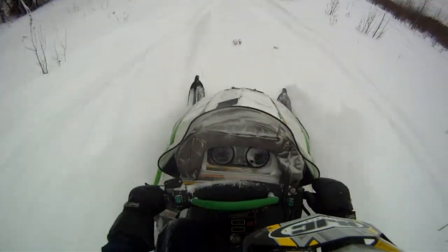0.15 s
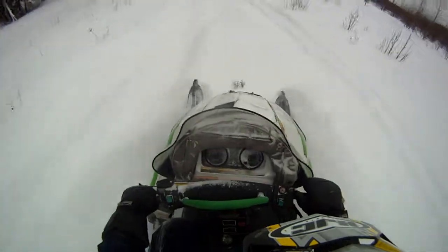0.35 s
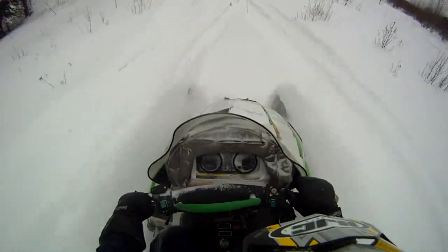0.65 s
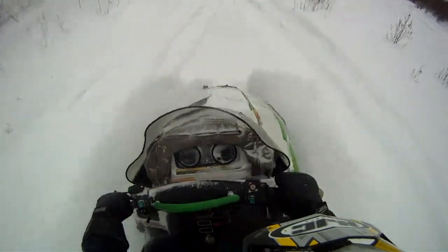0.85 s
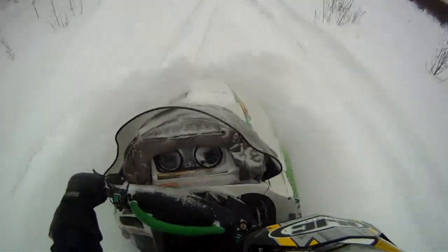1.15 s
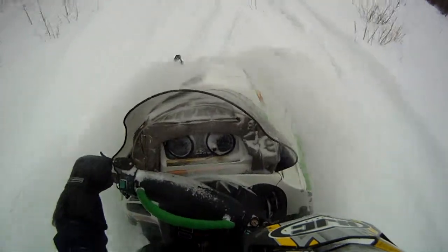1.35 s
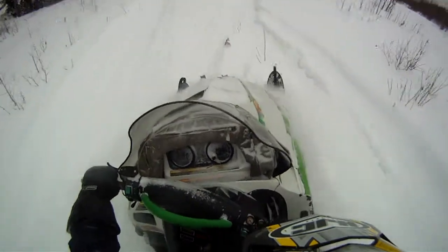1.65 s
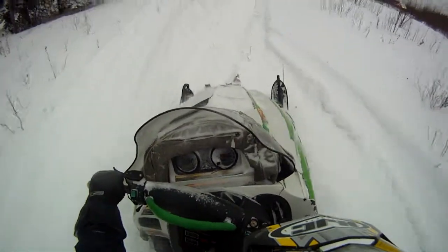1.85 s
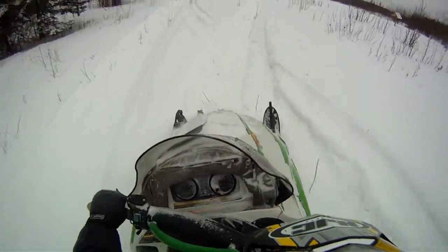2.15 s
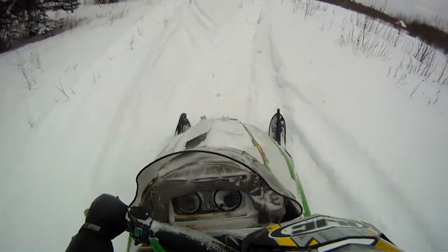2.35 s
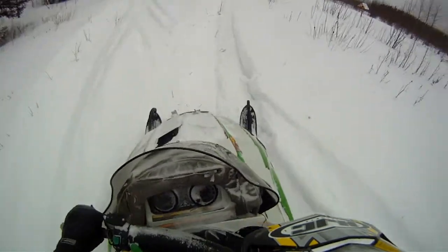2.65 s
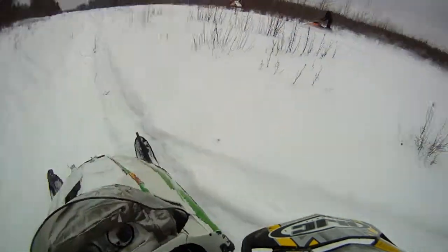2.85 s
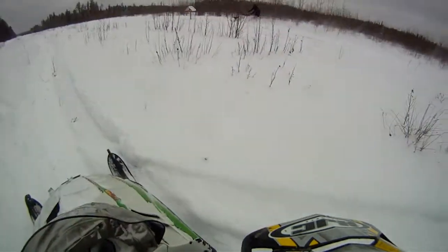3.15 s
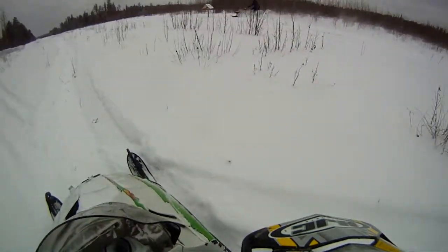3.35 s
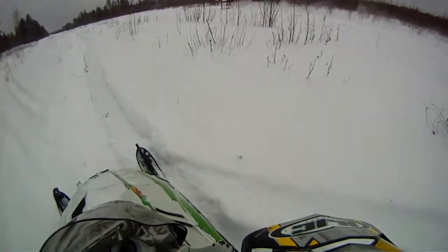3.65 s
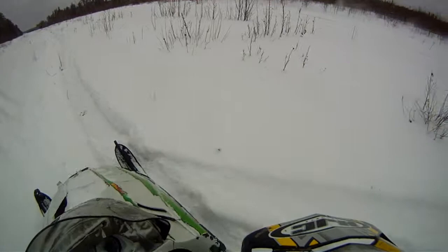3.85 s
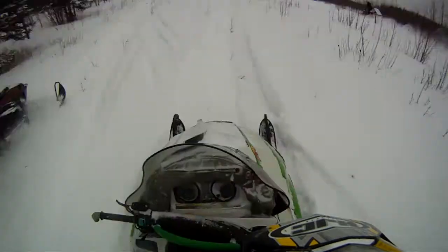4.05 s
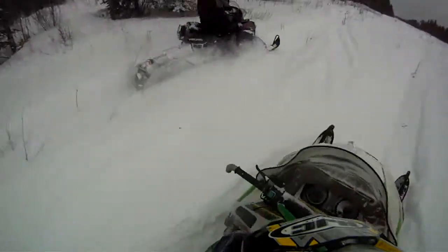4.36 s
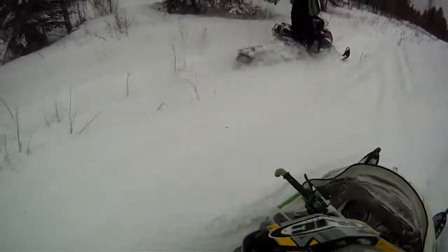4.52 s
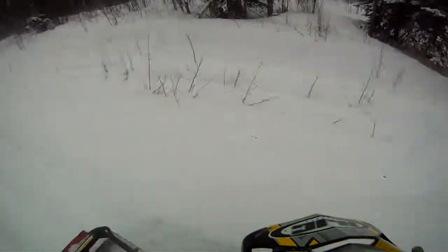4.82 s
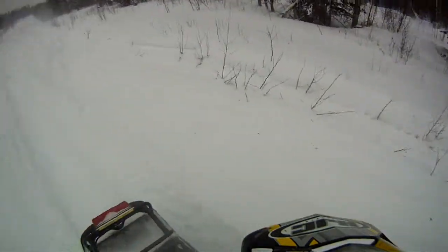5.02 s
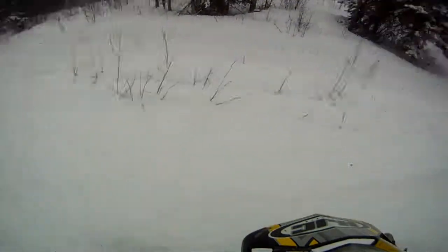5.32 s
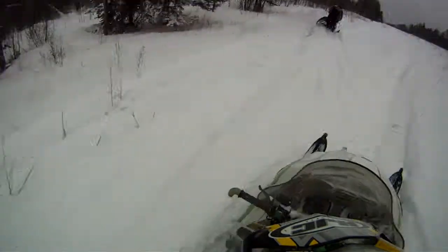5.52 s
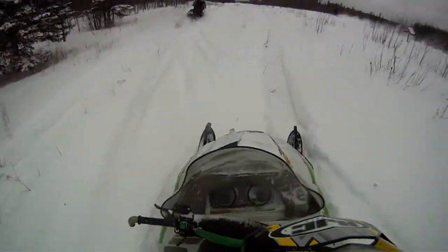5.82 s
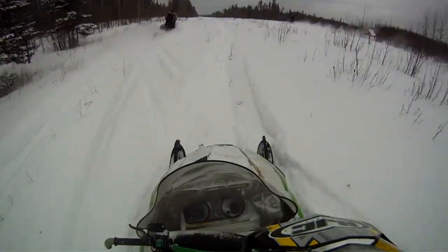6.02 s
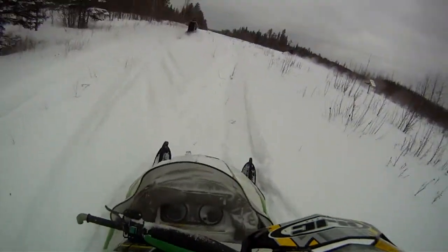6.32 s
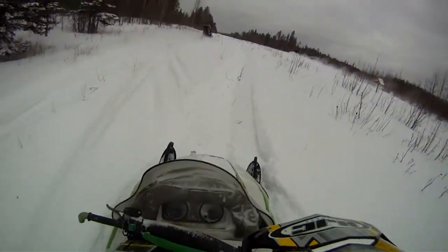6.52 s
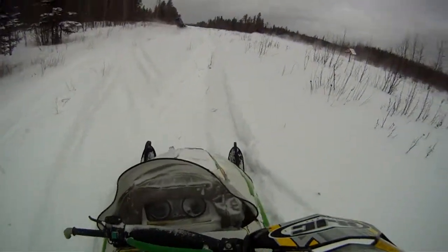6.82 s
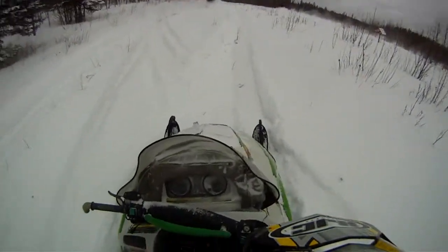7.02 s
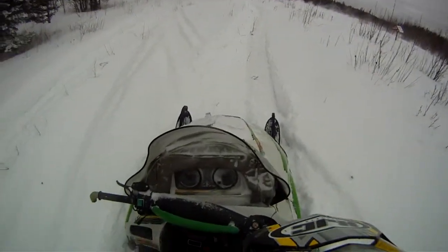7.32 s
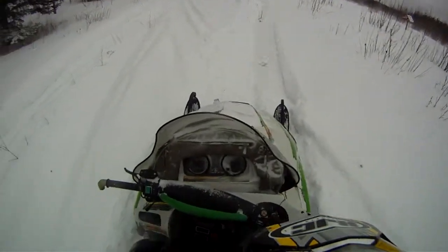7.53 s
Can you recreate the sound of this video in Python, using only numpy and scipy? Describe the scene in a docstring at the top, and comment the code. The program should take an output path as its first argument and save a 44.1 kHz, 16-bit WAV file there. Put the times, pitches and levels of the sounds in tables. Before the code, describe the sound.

A two-stroke snowmobile idles close by with a steady drone, a fizzy metallic rattle and a low rumble. Early on, one throttle blip makes it rise in a snarl and fall back. A second snowmobile revs past with a wavering whine and fades away. Near the end, a loud knock and dull bumps hit the helmet-mounted microphone while the idle continues. The open snow gives no echo.

```python
"""A two-stroke snowmobile idles in snow, heard from a camera on the rider's helmet: the exhaust drones,
the pistons rattle the hood, and the camera's coarse sampling mirrors the clatter into a thin fizz.
One blip of the throttle makes the pipe boom and the airbox snarl while a second sled pulls up.
That sled revs past, whining, and drives off as the rider looks over a shoulder.
Last, the helmet is knocked, wobbles on its padding and creaks."""
import sys
import numpy as np
from scipy import signal
from scipy.fft import rfft, irfft
from scipy.io import wavfile

SR = 44100
rng = np.random.default_rng(int(sys.argv[2]) if len(sys.argv) > 2 else 0)


def wav_out(sig):
    """Save sig, one row per channel (or a flat mono array), as 16-bit PCM at SR to the path in sys.argv[1]."""
    wavfile.write(sys.argv[1], SR, np.round(np.clip(np.atleast_2d(sig).T, -1, 1) * 32767).astype(np.int16))


N = 338688
T = np.arange(N) / SR
HZ = np.fft.rfftfreq(N, 1 / SR)

# firing rate of the rider's engine: time_s, firing_hz
ENGINE_SPEED = [(0.0, 133.1), (0.06, 128.7), (0.25, 124.9), (1.24, 120.8), (1.3, 124.7), (1.5, 156.0),
                (1.73, 171.9), (2.01, 134.3), (2.14, 127.7), (2.48, 123.7), (3.51, 126.2), (3.78, 124.0),
                (3.91, 126.3), (5.67, 126.1), (6.91, 122.8), (7.68, 125.6)]
# hood and crankcase resonances of both sleds: centre_hz, width_hz, gain_db
HOOD_MODES = [(580, 220, -13.5), (780, 48, -10.5), (988.4, 97, -2.5), (1140, 62, -10), (1248, 91, -4.5),
              (1454, 29, 4), (1619, 310, 4), (1912, 180, 1.5), (2230, 175, 0.5), (2190, 580, -8),
              (3002, 145, -6), (4300, 150, -14)]


def amp(db):
    """Decibels to gain."""
    return 10 ** (np.asarray(db) / 20)


def unit(x):
    """Scales to rms 1."""
    return x / np.sqrt(np.mean(x ** 2) + 1e-20)


def curves(rows):
    """Each column of a table, joined by straight lines over time."""
    times, *columns = np.transpose(rows)
    return [np.interp(T, times, column) for column in columns]


def bell(x, middle, width):
    """A smooth hump of height 1."""
    return np.exp(-((x - middle) / width) ** 2)


def arch(start_s, length_s):
    """A rounded swell from 0 to 1 and back."""
    return np.sqrt(np.maximum(1 - (2 * (T - start_s) / length_s - 1) ** 2, 0))


def slope(points):
    """An EQ curve drawn through (Hz, dB) points."""
    hz, db = np.transpose(points)
    return amp(np.interp(np.log(HZ + 1), np.log(hz), db))


def bumps(modes):
    """The EQ curve of a set of resonances."""
    powers = (amp(2 * db) / (1 + ((HZ - hz) / (0.5 * width)) ** 2) ** 2 for hz, width, db in modes)
    return np.sqrt(sum(powers))


def colour(x, gain):
    """Minimum-phase filter with the given EQ curve; rms 1 out."""
    cepstrum = irfft(np.log(np.maximum(gain, 1e-5)), N)
    cepstrum[1:N // 2] *= 2
    cepstrum[N // 2 + 1:] = 0
    return unit(irfft(rfft(x) * np.exp(rfft(cepstrum)), N))


def noise():
    """White noise of rms 1."""
    return rng.standard_normal(N)


def drift(hz):
    """A smooth random wander of rms 1, no faster than about hz."""
    step = 32
    white = rng.standard_normal(N // step + 1)
    lowpass = bell(np.fft.rfftfreq(len(white), step / SR), 0, hz)
    slow = irfft(rfft(white) * lowpass, len(white))
    return np.interp(np.arange(N) / step, np.arange(len(slow)), unit(slow))


def partial(turns, order):
    """A cosine at a multiple of the firing rate, with a random phase."""
    return np.cos(2 * np.pi * (order * turns + rng.random()))


def blows(turns, spread_db, jitter_s):
    """One click a turn, each of its own strength and a little off its time."""
    at = np.flatnonzero(np.diff(np.floor(turns)) > 0)
    size, shift = rng.standard_normal((len(at), 2)).T
    at = np.clip(at + np.round(shift * jitter_s * SR).astype(int), 0, N - 1)
    clicks = np.zeros(N)
    clicks[at] = amp(spread_db * np.clip(size, -2, 2))
    return unit(clicks)


def exhaust(turns, load):
    """Firing orders flutter as the burns vary; unequal cylinders add half orders that grow under load."""
    # the exhaust note and what shifts it: order, idle_db, throttle_db, lean_db, head_db
    orders = [(1, -42.5, 10, -5, 2.5), (2, -54, 3.5, 0, -1.5), (3, -70, 4, 20, 11), (4, -57, -1, -6, -1),
              (5, -53, -7, -11.5, 2)]
    # the rider leans out to one side and sits up again: time_s, lean (0-1)
    posture = [(0, 0.47), (.55, 0.4), (.95, 0.99), (1.9, 0.76), (2.3, 0.82), (2.7, 0.26), (3.6, 0.62),
               (4.4, .1), (6.7, 0.2)]
    pipe_hz, pipe_width_hz, pipe_db = 304.5, 22, 13
    firing_hz, = curves(ENGINE_SPEED)
    lean, = curves(posture)
    opening, head, burn = throttle(), head_turn(), drift(42)
    note = np.zeros(N)
    for order, idle_db, throttle_db, lean_db, head_db in orders:
        # on open throttle, the pipe booms as an order sweeps through its resonance
        boom_db = pipe_db * bell(order * firing_hz, pipe_hz, pipe_width_hz)
        db = idle_db + (throttle_db + boom_db) * opening + lean_db * lean + head_db * head
        flutter = 1 + 0.12 * burn + 0.13 * drift(41)
        note += amp(db) * flutter * partial(turns, order)
    halves = sum((1 + 0.6 * drift(14)) * partial(turns, k + .5) / np.sqrt(k + 1) for k in range(5))
    return np.sqrt(2) * (note + amp(-64.5 + 13.5 * load - 12 * head) * halves)


def machinery(turns, load):
    """Piston slap, loose clutch parts and fan puffs ring the hood; the colour shifts as the head turns."""
    # the hood's panels, between its resonances: freq_hz, gain_db
    panel_eq = [(120, -31), (200, -9.5), (420, -14), (850, -51), (1300, -49), (2000, -1), (2750, -8),
                (3500, -27), (4800, -45), (5600, -26)]
    # the bright rattle, facing forward: freq_hz, gain_db
    ahead_eq = [(1800, -15.5), (2600, -17), (3250, 3.5), (3500, 6.5), (3850, -1), (4250, 4.5), (5000, -3.5),
                (5700, -4.5)]
    # the rattle with the head fully turned: freq_hz, gain_db
    turned_eq = [(1800, -21), (2700, 10), (3300, 6), (4200, 1), (4700, 8), (5050, 5), (5350, -21),
                 (5700, -9)]
    # the rattle's fader, before load lifts it: time_s, level_db
    rattle_fader = [(0, -43.5), (.9, -50), (2.8, -47), (3.2, -43), (3.7, -43), (4.45, -51.5), (5.1, -46.5),
                    (5.7, -52), (7.68, -54)]
    rattle_db, = curves(rattle_fader)
    head = head_turn()
    first_piston = blows(turns / 2, spread_db=2.5, jitter_s=.00003)
    second_piston = blows(turns / 2 + .46, spread_db=4.5, jitter_s=.00005)
    slap = unit(first_piston + 1.08 * second_piston)
    loose = unit((rng.random(N) < 600 / SR) * noise())  # about 600 clicks a second
    fan = 1 + 0.015 * np.cos(2 * np.pi * turns) + 0.034 * np.cos(np.pi * turns) + 0.26 * drift(93)
    puffs = unit(fan * noise())
    # many short paths under the hood smear each blow over a few milliseconds
    paths = rng.standard_normal(2048) * np.exp(-T[:2048] / .004)
    knocking = unit(signal.oaconvolve(slap, paths)[:N])
    strokes = .3 * slap + .4 * knocking + .4 * loose + .7 * puffs
    hood = colour(strokes, np.hypot(slope(panel_eq), bumps(HOOD_MODES)))
    # two bands of noise come through with the head half turned
    glance_eq = bumps([(979, 45, -1.7), (2458, 160, 0.72)])
    glance = amp(-6) * np.sin(np.pi * head) * colour(noise(), glance_eq)
    chatter = 0.33 * slap + 0.13 * loose + 0.8 * puffs + 0.98 * noise()
    rattle = (1 - head) * colour(chatter, slope(ahead_eq)) + head * colour(chatter, slope(turned_eq))
    return amp(-40.5 + 6.5 * load) * (hood + glance) + amp(rattle_db + 9 * load) * rattle


def frame_rumble():
    """The frame's vibration comes up through the rider as a low rumble."""
    # the rumble's tone: freq_hz, gain_db
    rumble_eq = [(10, -7), (20, -13), (35, -5), (49, 2), (65, -6.5), (88, 0.5), (112, -4), (140, -8),
                 (175, -15), (260, -24.5), (380, -24), (500, -32), (1500, -53)]
    # its fader: time_s, level_db
    rumble_fader = [(0, -41.5), (1.0, -48.5), (1.7, -45.5), (2.3, -47), (3.8, -42.5), (4.2, -47.5),
                    (5.8, -44), (7.68, -42.5)]
    level_db, = curves(rumble_fader)
    return amp(level_db) * colour(noise(), slope(rumble_eq))


def clutch_rub(turns):
    """The clutch catches and lets go: faint wavering chirps at crank orders near the hood's resonances."""
    out = np.zeros(N)
    for order, db in [(11.5, -51), (13, -51), (15.5, -55)]:
        catch = unit(amp(5 * np.clip(drift(10), -2, 1.7)))
        chirp = unit(np.sin(2 * np.pi * order * turns + .9 * drift(60)))
        out += amp(db) * catch * chirp
    return out


def own_sled():
    """The rider's sled: one slightly hunting crankshaft drives its engine layers."""
    idle_hz, full_load_hz, coast_share = 126, 162, 0.6
    firing_hz, = curves(ENGINE_SPEED)
    turns = np.cumsum(firing_hz * (1 + .003 * drift(14))) / SR
    # load grows with speed above idle; with the throttle shut only a share of it is left
    revs = np.clip((firing_hz - idle_hz) / (full_load_hz - idle_hz), 0, 1)
    load = revs * (coast_share + (1 - coast_share) * throttle())
    rumble = frame_rumble()
    engine = exhaust(turns, load) + intake(turns, load) + machinery(turns, load)
    return rumble + engine + metal_ticks() + clutch_rub(turns) + belt_squeals()


def second_sled():
    """A passing sled: pipe note below, orders whining through hood resonances above, and track noise."""
    # its revs: time_s, firing_hz
    speed = [(0, 152), (3.1, 155), (3.5, 149), (3.75, 154.5), (3.9, 161), (4.1, 185), (4.19, 191),
             (4.33, 177), (4.78, 170.5), (4.95, 174.5), (5.18, 190), (5.22, 174), (5.36, 189), (7.68, 180)]
    # it closes in, passes and drives off: time_s, distance_m
    route = [(0, 40), (1.2, 13), (2.2, 5), (3.4, 5.23), (3.85, 3.4), (4.5, 8.1), (5.4, 9.9), (5.8, 17),
             (7.68, 42.9)]
    # its low pipe note: order, gain_db
    pipe_orders = [(1, -2), (2, -9), (3, 1), (4, -9), (5, -18)]
    # the resonances that shape its whine: freq_hz, gain_db
    whine_eq = [(1000, -27), (1300, -18), (1400, 0), (1750, 2), (1900, -14), (2100, -12), (2500, -28),
                (2950, -20), (3300, -30), (4250, -17), (5000, -34)]
    # surges of the whine: middle_s, half_length_s, boost_db
    surges = [(3.87, 0.17, 11.5), (4.132, 0.067, 16), (5.045, 0.21, 12), (5.29, 0.079, 7.5)]
    # the tone of its track: freq_hz, gain_db
    track_eq = [(900, -46), (1280, -8.5), (1400, 16.5), (1700, 18), (1850, 10.5), (2100, -16), (2450, -12),
                (3200, -47), (6000, -63)]
    firing_hz, = curves(speed)
    distance_m, = curves(route)
    turns = np.cumsum(firing_hz * (1 + .002 * drift(40))) / SR

    def rough_tone(order, depth):
        return np.sqrt(2) * (1 + depth * drift(28)) * partial(turns, order)

    pipe = unit(sum(amp(db) * rough_tone(order, depth=.12) for order, db in pipe_orders))
    pipe_db = -41.5 + 11.5 * bell(T, 3.85, 0.4)  # the pipe points at the rider only while alongside
    whine = np.zeros(N)
    for order in range(7, 26):
        resonance_db = np.interp(order * firing_hz, *np.transpose(whine_eq))
        even_db = -11 * (order % 2 == 0)  # odd orders ring the hood harder
        whine += amp(resonance_db + even_db) * rough_tone(order, depth=0.21)
    whine_db = -36 + sum(db * bell(T, middle_s, width_s) for middle_s, width_s, db in surges)
    # the track's noise gathers in a fuzzy whirr that climbs with the speed
    whirr_phase = 2 * np.pi * 9.3 * turns
    whirr = unit(drift(70) * np.cos(whirr_phase) + drift(70) * np.sin(whirr_phase))
    track = unit(0.55 * colour(noise(), slope(track_eq)) + 0.45 * whirr)
    clatter = colour(noise(), bumps(HOOD_MODES))
    treble = amp(whine_db) * whine + amp(-29) * track + amp(-30) * clatter
    facing = amp(8.5 * head_turn())  # the turned head points the camera at this sled
    return (amp(pipe_db) * pipe + facing * treble) / np.maximum(distance_m, 1)


def metal_ticks():
    """Loose metal ticks, each a short ring of four scattered partials."""
    # single ticks: start_s, pitch_hz, gain_db
    ticks = [(0.063, 3400, -44), (2.085, 3900, -42), (3.19, 4100, -39)]
    out = np.zeros(N)
    t = T[:2048]
    for start_s, hz, db in ticks:
        ring = sum(np.sin(2 * np.pi * hz * rng.uniform(.88, 1.29) * t) for _ in range(4)) / 2
        out[round(start_s * SR):][:len(t)] += amp(db + 6) * ring * np.exp(-t / .005)
    return out


def throttle():
    """One blip of the throttle, 0-1: opened, held and let go."""
    start_s, open_s, hold_s, close_s = 1.248, 0.12, 0.31, 0.13
    return np.interp(T, start_s + np.cumsum([0, open_s, hold_s, close_s]), [0, 1, 1, 0])


def intake(turns, load):
    """Under load, each gulp of air rings the airbox into a snarl."""
    # airbox resonances: centre_hz, width_hz, gain_db
    airbox_modes = [(560, 60, -14), (998, 56, 3.5), (1233, 36, 4), (1644, 160, 9), (2300, 120, -8),
                    (2870, 94, 4), (3033, 83, -2)]
    gulps = blows(turns, spread_db=2, jitter_s=.00003)
    gulps += .25 * blows(turns / 2, spread_db=3, jitter_s=.00003)
    return amp(-37) * load ** 0.77 * colour(gulps + 0.071 * noise(), bumps(airbox_modes))


def head_turn():
    """How far the rider's head is turned, 0-1."""
    # a look over the shoulder: time_s, turn (0-1)
    look = [(4.1, 0), (4.3, 0.28), (4.6, 0.37), (4.85, 0.8), (5.2, 0.76), (5.42, 1), (5.6, 0.05),
            (5.8, 0.2)]
    return np.clip(curves(look)[0], 0, 1)


def helmet_shade(sound):
    """With the head turned, the helmet shades the top of the treble."""
    corner_hz, depth = 5230, .95
    top = irfft(rfft(sound) / (1 + (corner_hz / (HZ + 1)) ** 30), N)
    return sound - depth * head_turn() ** 2 * top


def belt_squeals():
    """The drive belt squeals briefly, its pitch sagging as it grips."""
    # squeals: start_s, length_s, pitch_hz, level_db
    squeals = [(5.029, 0.12, 2980, -50), (6.84, 0.14, 2940, -47.5)]
    sag_per_s = .1
    out = np.zeros(N)
    for start_s, length_s, hz, db in squeals:
        pitch_hz = hz * (1 - sag_per_s * (T - start_s - length_s / 2) + .012 * drift(120))
        squeal = unit(np.sin(2 * np.pi * np.cumsum(pitch_hz) / SR))
        out += amp(db) * arch(start_s, length_s) * squeal
    return out


def helmet_rocking():
    """Each jolt rocks the helmet on its padding, with a low scuffing, until it settles."""
    # jolts: start_s, rise_s, hold_s, pitch_hz, level_db
    jolts = [(6.268, .008, 0.2, 48.7, -19), (6.8, 0.16, .01, 46, -31.5), (7.321, 0.19, .02, 34.6, -22.5),
             (7.52, 0.039, 0.011, 54, -26.5)]
    decay_s = 0.037
    scuff = colour(noise(), slope([(10, -13), (30, 12), (110, 1), (200, -26), (600, -64)]))
    out = np.zeros(N)
    for start_s, rise_s, hold_s, hz, db in jolts:
        t = np.maximum(T - start_s, 0)
        swing = np.minimum(t / rise_s, 1) ** 2 * np.exp(-np.maximum(t - rise_s - hold_s, 0) / decay_s)
        out += amp(db) * swing * (0.42 * scuff - np.sqrt(2) * np.sin(2 * np.pi * hz * t))
    return out


def shell_noise():
    """Noise with the hard, plastic colour of the helmet's shell."""
    # the shell's clack: freq_hz, gain_db
    clack_eq = [(300, -31), (650, -18), (950, 6.5), (1220, -2.5), (1550, 8), (1920, 11), (2350, -24),
                (2750, -7), (3150, -22), (3650, -6), (4200, -17), (5600, -22)]
    return colour(noise(), slope(clack_eq))


def helmet_knocks(shell):
    """Each knock thumps the shell's low modes and sets off a short clack."""
    # knocks: start_s, thump_db, clack_db, clack_decay_s
    knocks = [(6.272, -13.5, -21.5, 0.0061), (6.293, -21, -33.5, 0.0039), (6.309, -33, -23, 0.012),
              (6.335, -24.5, -40, 0.0066)]
    # the shell's low modes: pitch_hz, gain_db, t60_s
    thump_modes = [(120.1, 5.5, 0.23), (83, -32, .09), (186, -45, 0.027)]
    out = np.zeros(N)
    for start_s, thump_db, clack_db, decay_s in knocks:
        t = np.maximum(T - start_s, 0)
        attack = 1 - np.exp(-t / .0015)
        thump = sum(amp(db - 60 * t / t60) * np.sin(2 * np.pi * hz * t) for hz, db, t60 in thump_modes)
        clack = shell * (2 * t / decay_s) * np.exp(1 - 2 * t / decay_s)
        out += amp(clack_db) * clack - amp(thump_db) * attack * thump
    return out


def helmet_creaks(shell):
    """The plastic sticks and slips at an unsteady rate, in tiny creaks."""
    # creaks: start_s, length_s, slip_hz, level_db
    creaks = [(7.518, .016, 960, -41.5), (7.6162, .015, 975, -29.5)]
    out = np.zeros(N)
    for start_s, length_s, slip_hz, db in creaks:
        slips = np.cumsum(slip_hz * (1 + 0.054 * drift(370))) / SR
        slipping = unit(sum(np.cos(2 * np.pi * k * slips) / k ** 2 for k in range(1, 4)))
        out += amp(db) * arch(start_s, length_s) * (slipping + .45 * shell)
    return out


def scene():
    """Both sleds and the helmet, in mono, in open snow with no echo."""
    sleds = helmet_shade(own_sled() + second_sled())
    wobble = helmet_rocking()
    shell = shell_noise()
    return (sleds + wobble + helmet_knocks(shell) + helmet_creaks(shell))[None]


def record(dry):
    """The camera adds faint hiss and holds each coarse sample, mirroring the sound into the treble."""
    hiss_db, guard_hz, camera_rate_hz, band_limit_hz = -47, 5750, 12000, 15350
    hissing = dry + amp(hiss_db) * noise()
    guarded = signal.oaconvolve(hissing, signal.firwin(141, guard_hz, fs=SR)[None], "same")
    coarse = signal.resample(guarded, round(N * camera_rate_hz / SR), axis=1)
    held = signal.resample(np.repeat(coarse, 4, axis=1), N, axis=1)
    band_limit = signal.firwin(511, band_limit_hz, window=("kaiser", 9), fs=SR)
    return signal.oaconvolve(held, band_limit[None], "same")


dry = scene()
out = record(dry)
wav_out(out)
```